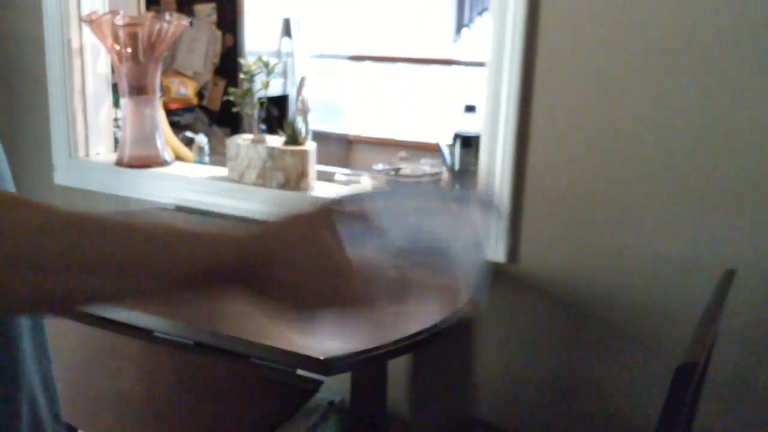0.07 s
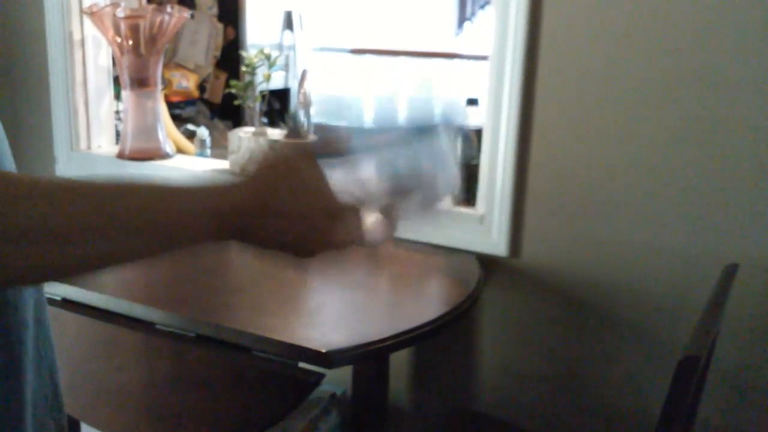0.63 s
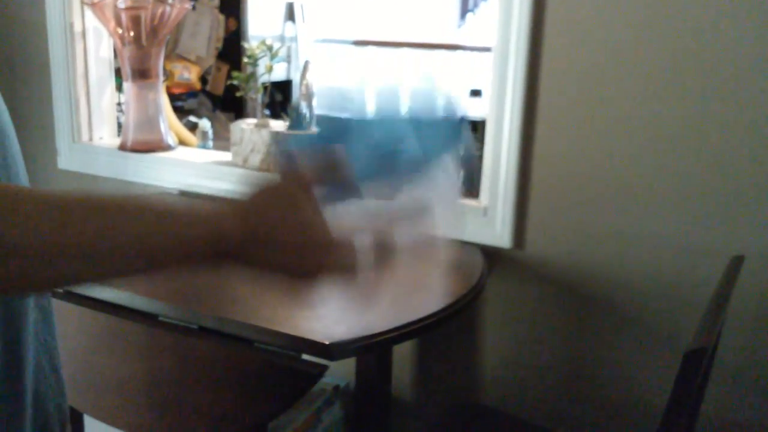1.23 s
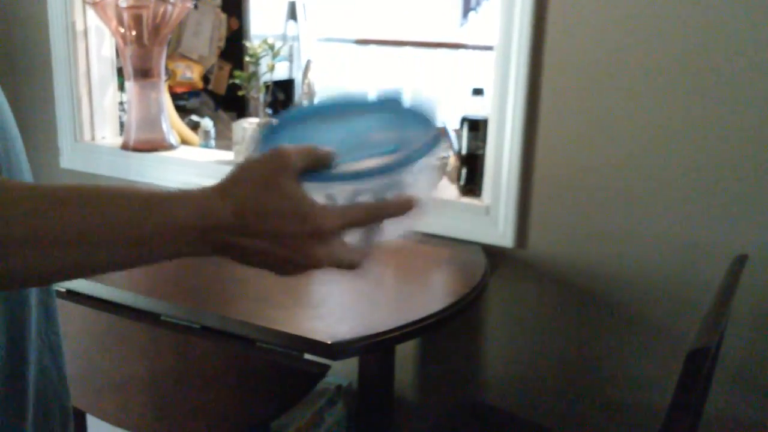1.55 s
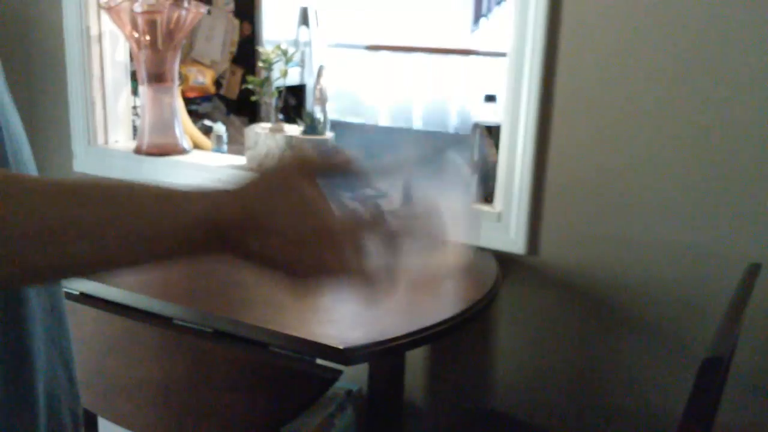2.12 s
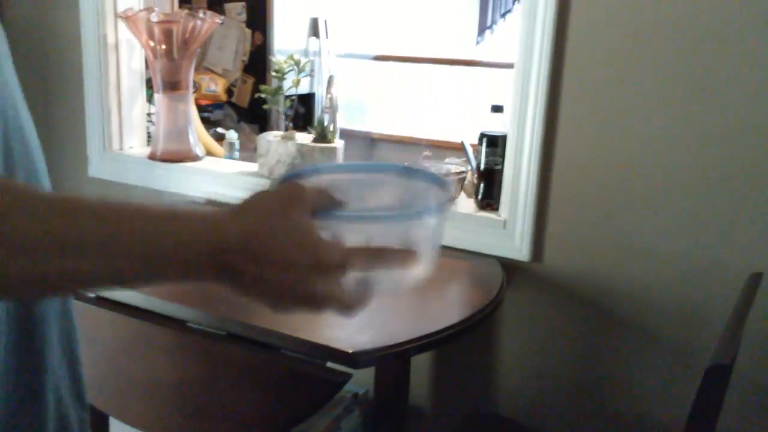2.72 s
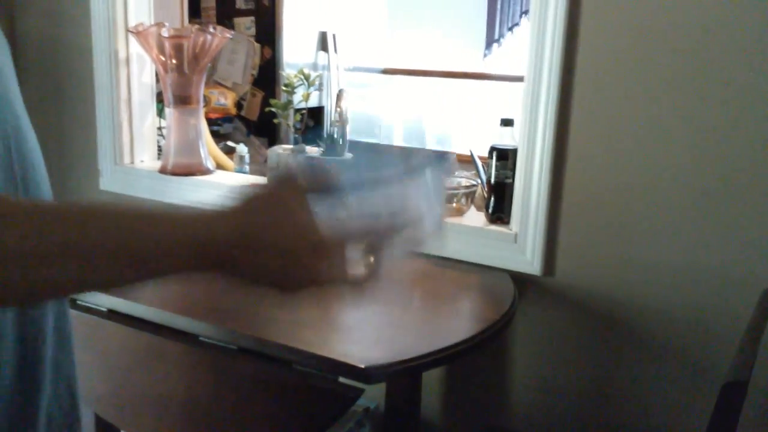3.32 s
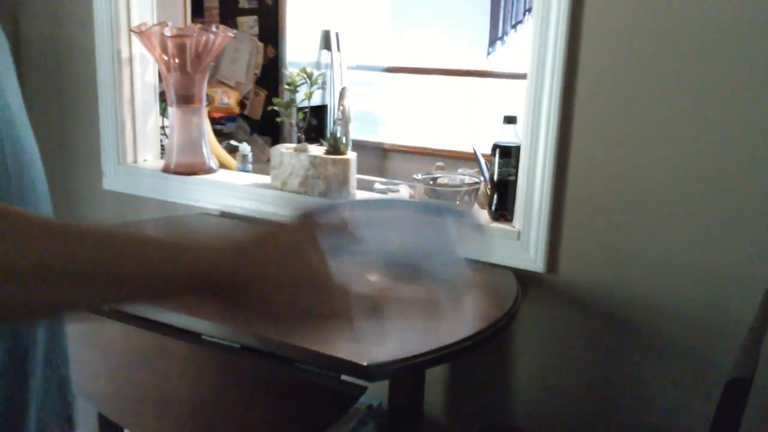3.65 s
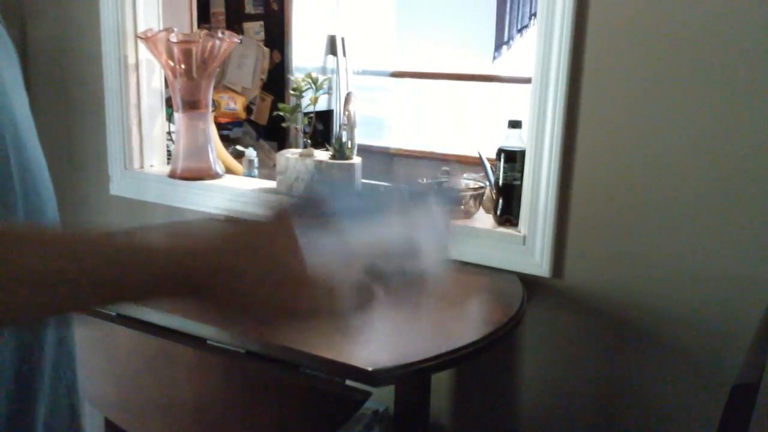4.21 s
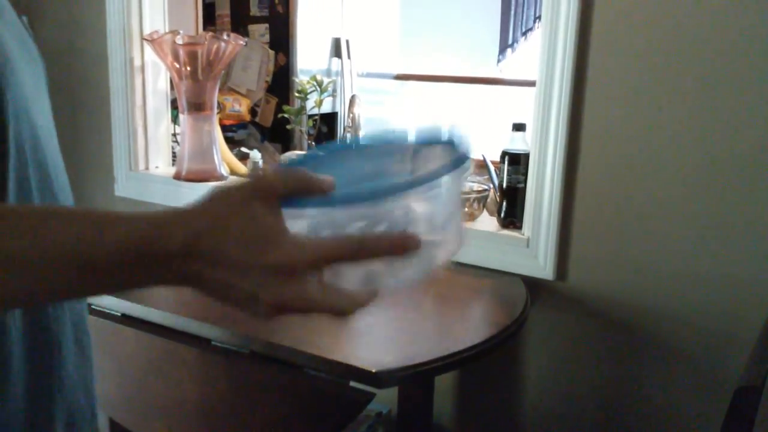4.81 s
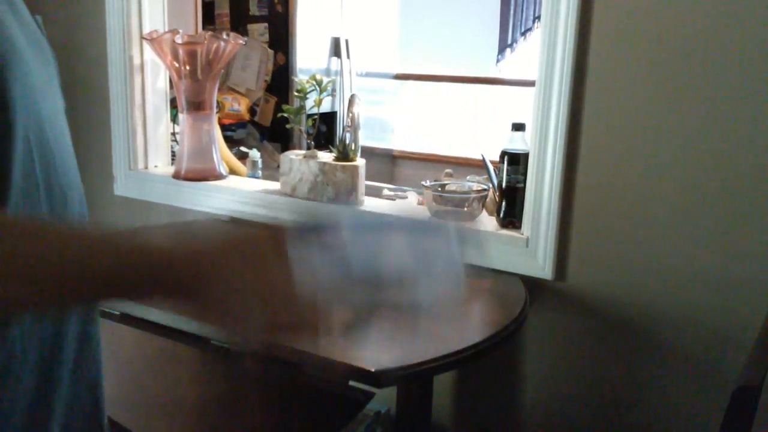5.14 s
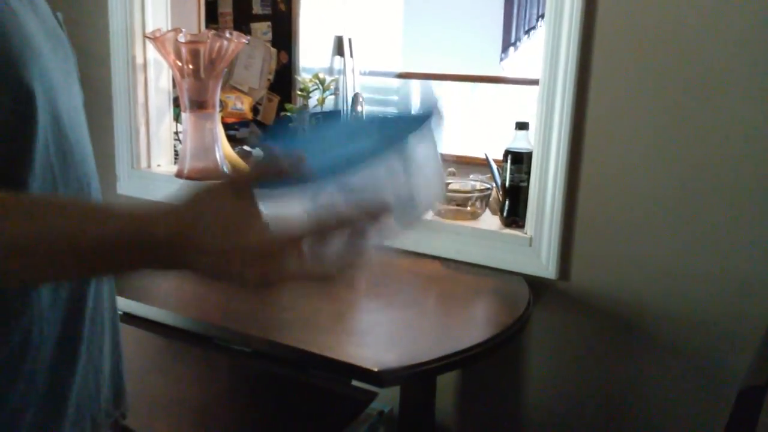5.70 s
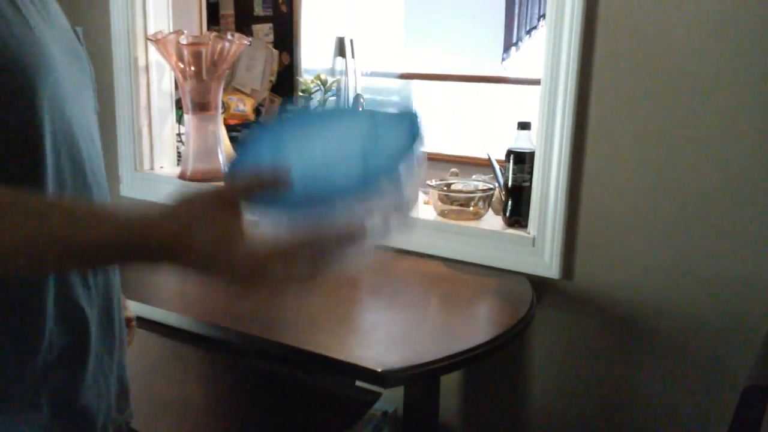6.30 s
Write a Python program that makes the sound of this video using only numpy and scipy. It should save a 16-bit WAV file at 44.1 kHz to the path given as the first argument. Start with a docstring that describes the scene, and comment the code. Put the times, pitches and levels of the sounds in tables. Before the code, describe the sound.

From the first moment, folded paper slips rattle hard inside a lidded plastic tub. The pile strikes the base and the lid by turns, about eleven times a second, each landing a crisp shower of ticks with a soft, hollow thump. Stiff corners add sharp snaps on the plastic, and loose slips slide and patter in between. The rattle runs on quickly, softening slightly around 3 seconds. From about 4.2 to 4.8 seconds it falls into a lull with only a few light ticks. Full shaking returns by 5 seconds, slips briefly near 5.6, gives a strong, bright hit at about 6, and thins out by 6.5 seconds. The sound is close, with the short reflections of a small room. Faint room noise lies underneath, and a quiet low hum swells between roughly 0.5 and 1.2 seconds.

```python
"""A small room: folded paper slips are shaken hard in a lidded plastic tub, with a lull after 4 s.
About eleven times a second the pile lands, by turns on the hollow base and on the lid, as a shower of
ticks with a soft thump. Stiff folded corners snap on the plastic; loose slips slide and tumble as long
as the hand keeps moving. Behind it lie faint room noise and a low hum that swells briefly."""
import sys
import numpy as np
from scipy import signal
from scipy.fft import irfft
from scipy.io import wavfile
from scipy.ndimage import uniform_filter1d

SR = 44100
rng = np.random.default_rng(int(sys.argv[2]) if len(sys.argv) > 2 else 0)


def to_wav(s):
    """Save 16-bit WAV."""
    ch = np.atleast_2d(s).T  # columns
    pcm = np.round(np.clip(ch, -1, 1) * 32767)  # PCM
    wavfile.write(sys.argv[1], SR, pcm.astype(np.int16))


N = 289296
SIZE = 8192  # samples per event
HZ = np.fft.rfftfreq(SIZE, 1 / SR)
TOP = np.clip((HZ - 8000) / 4000, 0, 1)  # treble shelf, 0..1

# pile landings: t/s, face, clatter/dB, paper edges re clatter/dB, settling/s, thump/dB
LANDINGS = [ (.004, "lid", 3.5, -5.5, 0.018, -10.5), (.08, "base", -2, -22, 0.012, -31),
            (.116, "base", 6.5, -3.5, 0.0097, -24), (.18, "lid", 4, -7, 0.011, -19),
            (.301, "base", 3.5, -6, 0.017, -21), (.36, "lid", 4.5, -6, 0.014, -12),
            (.454, "base", 2.5, -4, 0.024, -29), (0.529, "lid", 4.5, -6.5, 0.023, -34),
            (.635, "base", 3.5, -4.5, 0.02, -16), (.67, "side", 3.5, -21, 0.005, -29),
            (.702, "lid", 5, -2.5, 0.014, -6.5), (.808, "base", 4.5, -2, 0.019, -19),
            (.879, "side", 3.5, -17, 0.0093, -17), (.887, "lid", 11, -7, 0.02, -24),
            (.981, "base", 6, -1, 0.023, -10), (1.065, "lid", 3, -7, 0.02, -10),
            (1.155, "base", -0.5, -28, 0.021, -22), (1.227, "lid", 3.5, -27, 0.018, -11),
            (1.25, "side", 5, -5, 0.011, -18), (1.335, "base", -2, -7, 0.017, -19),
            (1.426, "lid", 7.5, -7, 0.017, -6.5), (1.521, "base", 8.5, -6.5, 0.021, -34),
            (1.575, "lid", 6, -12, 0.013, -32), (1.6, "side", 7.5, -6, 0.011, -29),
            (1.667, "side", 5.5, -30, 0.008, -24), (1.703, "side", 3.5, 1.5, 0.023, -19),
            (1.722, "base", 5.5, -17, 0.017, -8), (1.785, "lid", 4, -3, 0.02, -15),
            (1.89, "base", -8, -21, 0.025, -16), (1.911, "side", 6, -9, .024, -10),
            (1.926, "side", 5.5, -18, .007, -19), (1.981, "lid", 2.5, -10, 0.015, -12),
            (2.073, "base", 3.5, -4, .017, -17), (2.12, "lid", 8.5, -6.5, 0.012, -19),
            (2.2, "side", 4.5, -9, 0.0094, -30), (2.253, "base", -16, -12, 0.015, -18),
            (2.3, "lid", 2, -2.5, 0.014, -13), (2.417, "base", -5, -3, .021, -26),
            (2.468, "lid", 6, -7.5, 0.0072, -15), (2.6, "base", -6.5, -2, .014, -14),
            (2.679, "lid", 11, -7, 0.0061, -9.5), (2.776, "base", -1.5, -1.5, 0.015, -22),
            (2.848, "lid", 1.5, -0.5, 0.014, -11), (2.938, "base", -16.5, -4, 0.0085, -16),
            (2.989, "side", -14.5, 5, 0.0056, -34), (3.045, "lid", -4, 0.5, 0.011, -10.5),
            (3.142, "base", -2.5, 3, 0.018, -22), (3.215, "lid", 0.5, -1, 0.011, -14),
            (3.302, "base", -11, -17, .006, -10), (3.318, "side", -9, -14, 0.03, -29),
            (3.393, "lid", 3.5, -4.5, .015, -14), (3.484, "base", 2.5, -10, 0.016, -10.5),
            (3.576, "side", 8, -4, 0.014, -23), (3.675, "base", 4, -3, 0.016, -8.5),
            (3.763, "lid", 7.5, -5, 0.0066, -14), (3.85, "base", -0.5, -6, 0.0058, -15),
            (3.936, "lid", 4, -4, .011, -12), (4.037, "base", -4.5, 4, 0.015, -13),
            (4.128, "lid", -1.5, -3, .012, -21), (4.205, "side", -3, -16, .013, -30),
            (4.284, "side", -10.5, -4, 0.019, -25), (4.379, "side", -14.5, -11, 0.0181, -36),
            (4.424, "side", -20.5, 4.5, 0.0031, -36), (4.494, "side", -19, -4, 0.012, -41),
            (4.558, "side", -40, -15, 0.0054, -39), (4.629, "side", -19, -23, 0.0076, -43),
            (4.672, "side", -14, 0.5, 0.02, -34), (4.772, "base", -9.5, -0.5, 0.015, -10),
            (4.806, "side", -8.5, -4, 0.0095, -14), (4.835, "side", -4, -6.5, .006, -13),
            (4.864, "side", -9, 2, .011, -30), (4.955, "side", -12, 7.5, .012, -18),
            (5.031, "lid", 2, -0.5, 0.017, -13), (5.131, "base", 2.5, 0.5, 0.011, -11),
            (5.155, "side", 2.5, -3, 0.0085, -22), (5.213, "lid", 3.5, -2, .016, -9.5),
            (5.317, "base", -7.5, 6, 0.015, -15), (5.408, "lid", 0.5, -2.5, 0.01, -13),
            (5.502, "base", -2.5, 1, 0.012, -39), (5.591, "lid", -8, 1.5, 0.011, -19.5),
            (5.737, "side", -7.5, -27, 0.002, -30), (5.749, "side", 2, 2, 0.017, -16),
            (5.843, "lid", -2.5, -11, 0.026, -17), (5.902, "base", -11.5, 5, 0.016, -27),
            (5.929, "lid", 2, -5, 0.013, -23), (6.03, "base", -15.5, 13, 0.017, -3.5),
            (6.123, "base", -7, 5, 0.016, -15), (6.252, "side", -7.5, -5, 0.0067, -19),
            (6.323, "side", -5, -2.5, 0.036, -27), (6.369, "lid", -4, -4, 0.01, -18)]
# spectra of struck wall, paper edges and flexing tub: f/Hz, level/dB
WALL_SPECTRUM = [(300, -26.5), (800, -19.5), (1300, -9), (1800, -5), (2250, 1), (3000, 2), (3700, 0),
                 (4500, -1), (5400, -5), (8000, -14.5), (16000, -20.5)]
EDGE_SPECTRUM = [(1500, -46), (3500, -32), (4500, -3.5), (5400, -5.5), (6700, 0.5), (7700, -2),
                 (9000, -6.5), (10500, -5.5), (12700, -2.5), (14500, -4), (16000, -14)]
FLEX_SPECTRUM = [(25, -25), (60, -5), (95, -8.5), (150, -2.5), (220, -1), (380, -0.5), (520, -8.5),
                 (800, -6.5), (1500, -13.5), (5000, -74)]


def landings(lead_s=.002, clack_db=4, clack_oct=0.53, spot_oct=0.17, ripple_db=2):
    """The slips land in a quick shower, sounding the wall, their own edges and the hollow tub."""
    # hollow knock: f/Hz, level/dB
    knock_spectrum = [(150, -32), (300, -20), (480, -10.5), (650, -4.5), (900, 1), (1300, 0), (1700, -6),
                      (2600, -2), (6000, -38)]
    out, t = np.zeros(N), np.arange(SIZE) / SR
    wall, edges, knock = tub(WALL_SPECTRUM), curve(EDGE_SPECTRUM, HZ), tub(knock_spectrum)
    for at_s, face, db, crisp_db, settle_s, thump_db in LANDINGS:
        face_db, clack_hz, _ = tub_face(face)
        knock_db = face_db + 0.49 * db + 0.2 * thump_db
        rise_s = .22 * settle_s
        pile = (1 - np.exp(-t / rise_s)) ** 2 * np.exp(-t / settle_s)
        late_s = .9 * settle_s * (.5 + rng.random())
        stragglers = 0.58 * np.interp(t - late_s, t, pile)
        shower = np.hypot(pile, stragglers) * ticks(SIZE, per_s=2200, spread_db=1.5, scrape=0.31)
        clack = wall + clack_db * bell(clack_hz * 2 ** (spot_oct * jitter()), clack_oct)
        flick = edges + 0.79 * crisp_db * TOP  # crisper landings reach higher
        colour = blend((clack, db), (flick, db + crisp_db), (knock, knock_db))
        colour += ripple_db * spot_ripple(bins=60)
        add(out, at_s - lead_s - rise_s / 2, np.linalg.norm(amp(colour)) * unit(through(shower, colour)))
    return out


def snaps(level_db=-0.5, buckle_s=0.00075, ring_s=0.026, ring_db=-7, lead_s=.0001):
    """Folded corners buckle on the plastic, each with its own stiffness; the wall rings on briefly."""
    # hard corner hits: t/s, level/dB, treble shelf/dB
    hard_hits = [(.116, 8, 3.5), (.461, 4.5, -9), (.48, 5.5, -8), (.807, 0, -5), (.819, 2, -7),
                 (.889, 9.5, 3), (.894, 10, -4), (.981, 8.5, 4), (1.181, 9.5, -4), (1.253, 4.5, -3),
                 (1.339, -5.5, 3), (1.702, 4, -6), (1.712, 9, -13), (1.911, 5, -5), (1.986, 5.5, -1),
                 (2.089, 11, -4.5), (2.254, 11, -5), (2.431, 1.5, -9), (2.68, -11, -8), (2.685, 11.5, 1),
                 (2.78, 4, 0), (3.144, 1, -13), (3.316, 3, -11), (3.327, 11.5, -4.5), (3.515, 5, 2),
                 (3.684, 7.5, -3), (3.763, 0, 0), (3.852, 6, -6), (3.868, -6, 0), (3.928, -4.5, 6),
                 (4.035, 4, 15), (4.039, 5, -10), (4.956, 4, -15), (5.131, 5, -11), (5.154, 4, -11),
                 (5.317, 3, -13), (5.326, 3.5, -2), (5.501, 2.5, -1), (5.528, 3, -8), (5.902, -5, 4),
                 (6.031, 7.5, -10), (6.251, -9, -18), (6.257, 4, -7.5)]
    # buckling corner: f/Hz, level/dB
    corner_spectrum = [(300, -50.5), (1200, -8.5), (2500, -22), (3700, -6), (5200, -4), (6400, 2),
                       (7500, 2.5), (8600, -6), (10000, -8.5), (12700, 3), (14500, 3.5), (16500, -8.5)]
    # one lesser corner per landing, same columns
    soft_hits = [(at_s + .007 * rng.random(), db + crisp_db - 12.5 + 4 * jitter(), -6)
                 for at_s, _, db, crisp_db, _, _ in LANDINGS]
    out, t, wall = np.zeros(N), np.arange(SIZE) / SR, tub(WALL_SPECTRUM)
    for at_s, db, top_db in hard_hits + soft_hits:
        corner = curve(corner_spectrum, HZ * np.exp(0.13 * jitter()))  # stiffness shifts the spectrum
        chatter = 0.38 * rng.standard_normal(SIZE) * np.exp(-t / buckle_s)
        push = (t == 0) + chatter
        crack = unit(through(push, corner + TOP * top_db + spot_ripple(bins=200)))
        ring = unit(through(rng.standard_normal(SIZE) * np.exp(-t / ring_s), wall))
        add(out, at_s - lead_s, amp(db + level_db) * (crack + amp(ring_db) * ring))
    return out


def thumps(level_db=-1, focus_db=18, focus_oct=0.4, spot_oct=0.23, damping_s=0.047):
    """The pile's weight rings the low modes of the struck face until the hand damps them."""
    out, body = np.zeros(N), tub(FLEX_SPECTRUM)
    grip = np.exp(-np.arange(SIZE) / SR / damping_s)
    for at_s, face, _, _, settle_s, db in LANDINGS:
        _, _, thump_hz = tub_face(face)
        focus = focus_db * bell(thump_hz * 2 ** (spot_oct * jitter()), focus_oct)
        add(out, at_s + settle_s / 2, amp(db + level_db) * unit(grip * response(body + focus)))
    return out


def tumble(slide_db=-4, edges_db=-8, flex_db=1):
    """Loose slips patter along the wall while the tub flexes, damped by the hand."""
    # vigour of the shaking: t/s, sliding/dB, flexing/dB
    vigour = [(0.0, -28, -49.5), (0.33, -37, -49.5), (0.93, -34.5, -47.5), (1.35, -36, -48),
              (1.59, -38, -49.5), (2.08, -32, -48), (2.96, -43.5, -51.5), (3.71, -33.5, -48),
              (4.07, -38.5, -45.5), (4.48, -56, -60), (4.73, -57, -58), (5.01, -36, -49.5),
              (5.35, -31.5, -47.5), (5.63, -51, -52), (6.06, -36.5, -45), (6.56, -64, -56)]
    times_s, *levels_db = np.transpose(vigour)
    slide, flex = (amp(np.interp(np.arange(N) / SR, times_s, db)) for db in levels_db)
    patter = slide * ticks(N, per_s=770, spread_db=-2.5, scrape=0.14)
    bumps = flex * ticks(N, per_s=130, spread_db=1.5, scrape=0.57)
    paper = blend((tub(WALL_SPECTRUM), 0), (curve(EDGE_SPECTRUM, HZ), edges_db))
    sliding = amp(slide_db) * through(patter, paper)
    return sliding + amp(flex_db) * through(bumps, curve(FLEX_SPECTRUM, HZ))


def ticks(count, per_s, spread_db, scrape):
    """Random contacts of uneven size over a little continuous scraping."""
    size = amp(spread_db * np.minimum(rng.exponential(1, count), 4))
    train = size * rng.choice([-1, 1], count) * (rng.random(count) < per_s / SR)
    return unit_rms(train) + scrape * rng.standard_normal(count)


def tub(spectrum):
    """A spectrum in dB with the tub's resonances on top."""
    # tub and lid modes: f/Hz, width/Hz, lift/dB
    modes = [(260.5, 20, 23), (346, 14, 3), (374, 17, 5.5), (547, 47, 7), (900, 16, 0.5), (1324, 29, 4),
             (1568, 185, 6), (1785, 59, 3.5), (2210, 140, 1), (2240, 80, 1)]
    lift_db = sum(db / (1 + (2 * (HZ - hz) / width_hz) ** 2) for hz, width_hz, db in modes)
    return curve(spectrum, HZ) + lift_db


def tub_face(name):
    """How one face of the tub answers the pile."""
    # face, knock/dB, clack/Hz, thump/Hz
    faces = [("base", -1.5, 3000, 375), ("lid", -10, 2350, 292), ("side", -11, 2170, 400)]
    return next(row[1:] for row in faces if row[0] == name)


def spot_ripple(bins):
    """Each spot on the wall favours other frequencies: a smooth random ripple of rms 1."""
    noise = rng.standard_normal(len(HZ))
    return unit_rms(uniform_filter1d(uniform_filter1d(noise, bins), bins))


def room(x):
    """The tub keeps moving, so each 0.1 s meets other reflections."""
    out, step = np.zeros(N), SR // 10
    for start in range(0, N, step):
        add(out, start / SR, signal.fftconvolve(x[start:start + step], reflections()))
    return out


def reflections(gap_s=.003, stride=20):
    """Sparse echoes of random sign, each band dying at its own rate."""
    # room decay: f/Hz, T60/s
    t60 = [(100, 0.068), (500, 0.44), (2500, 0.33), (7000, 0.28), (15000, 0.39)]
    count, taps = SIZE // 10, np.zeros(3 * SIZE)
    slots = round(gap_s * SR) + np.arange(count) * stride
    taps[slots + rng.integers(0, stride, count)] = rng.choice([-1, 1], count)
    hz, t, bands = signal.stft(taps, SR, nperseg=256)
    decay = amp(-60 * t / curve(t60, hz)[:, None])
    return unit(signal.istft(bands * decay, SR)[1])


def background(air_db=-56, hum_hz=70):
    """Quiet room noise and a low hum that swells briefly."""
    # room noise: f/Hz, level/dB
    air_spectrum = [(25, 7), (60, -2), (100, -2.5), (250, -13.5), (600, 3.5), (1200, -6), (2500, -17),
                    (5000, -66), (11000, -17), (16000, -8.5)]
    # hum: t/s, level/dB
    hum_levels = [(0, -75), (.35, -70), (.5, -55.5), (1.15, -56.5), (1.35, -72), (6.56, -91)]
    t = np.arange(N) / SR
    hum_rms = amp(np.interp(t, *np.transpose(hum_levels)))
    hum = hum_rms * np.sqrt(2) * np.sin(2 * np.pi * hum_hz * t)
    return hum + amp(air_db) * through(rng.standard_normal(N), curve(air_spectrum, HZ))


def amp(db):
    return 10 ** (np.asarray(db) / 20)


def unit_rms(x):
    return x / np.sqrt(np.mean(x ** 2) + 1e-20)


def unit(x):
    return x / (np.linalg.norm(x) + 1e-20)


def jitter():
    return rng.uniform(-1, 1)


def curve(points, hz):
    """Interpolates over log frequency."""
    points_hz, values = np.transpose(points)
    return np.interp(np.log(hz + 1), np.log(points_hz + 1), values)


def bell(hz, width_oct):
    """Spectral hump of height 1."""
    return np.exp(-(np.log2((HZ + 1) / hz) / width_oct) ** 2)


def blend(*parts):
    """Power sum of (spectrum/dB, energy/dB) pairs, in dB."""
    return 10 * np.log10(sum((amp(db) * unit(amp(spectrum))) ** 2 for spectrum, db in parts))


def response(spectrum_db):
    """Minimum-phase impulse response of energy 1."""
    log_gain = np.log(amp(np.concatenate([spectrum_db, spectrum_db[-2:0:-1]])))
    return unit(irfft(np.exp(np.conj(signal.hilbert(log_gain)))[:len(HZ)]))


def through(x, spectrum_db):
    return signal.oaconvolve(x, response(spectrum_db))[:len(x)]


def add(mix, at_s, sound):
    part = mix[max(round(at_s * SR), 0):][:len(sound)]
    part += sound[:len(part)]


def scene(wet_db=-5.5, snap_wet_db=-7):
    """The rattle in its room, mono; the snaps arrive more directly."""
    rattle = landings() + thumps() + tumble()
    cracks = snaps()
    reverb = room(amp(wet_db) * rattle + amp(snap_wet_db) * cracks)
    return (rattle + cracks + reverb + background())[None]


def record(dry, ceiling=.85, cutoff_hz=16050):
    """Hard clip, then low-pass."""
    low_pass = signal.firwin(701, cutoff_hz, window=("kaiser", 8), fs=SR)
    return signal.oaconvolve(np.clip(dry, -ceiling, ceiling), low_pass[None], "same")


dry = scene()
out = record(dry)
to_wav(out)
```